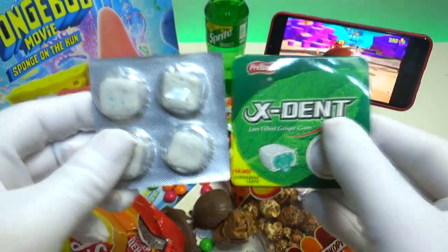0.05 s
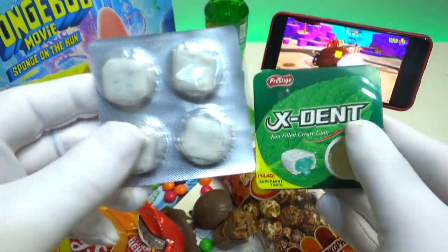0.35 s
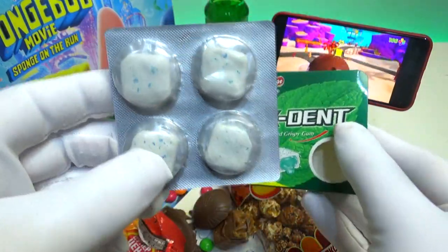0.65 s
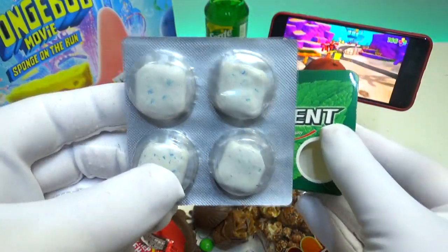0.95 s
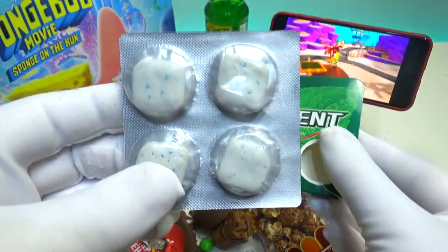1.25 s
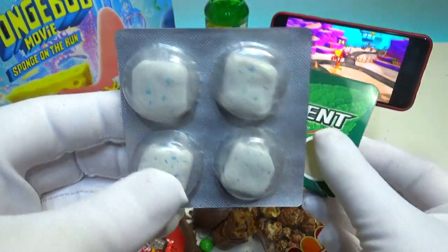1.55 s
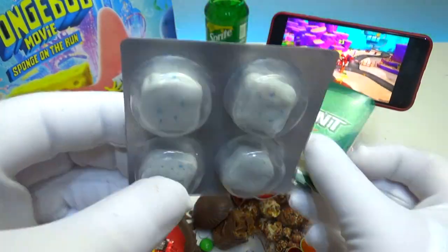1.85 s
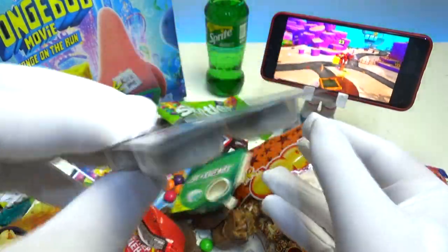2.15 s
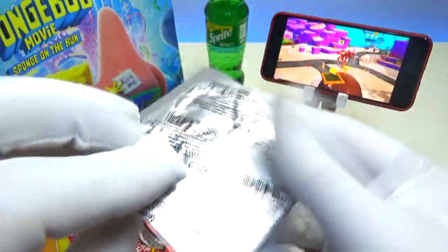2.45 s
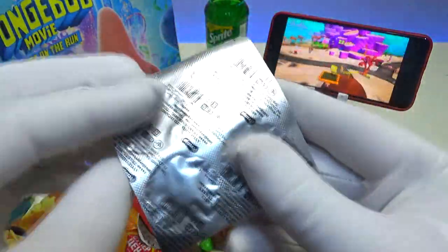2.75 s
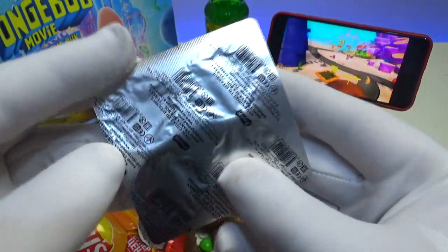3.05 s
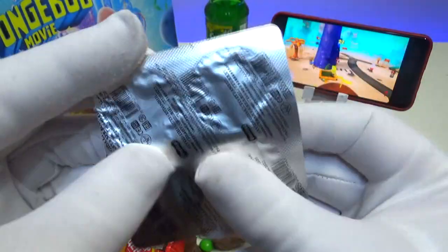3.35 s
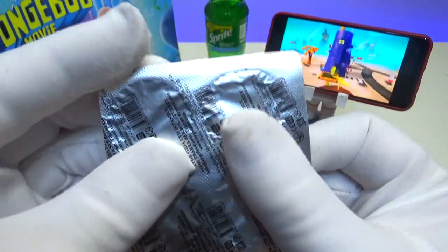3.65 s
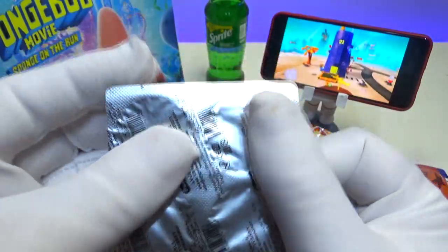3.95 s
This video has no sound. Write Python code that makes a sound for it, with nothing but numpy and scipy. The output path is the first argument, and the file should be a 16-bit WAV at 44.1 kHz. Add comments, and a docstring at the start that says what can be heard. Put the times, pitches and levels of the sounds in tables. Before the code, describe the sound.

A foil and plastic blister pack slides from its card sleeve, then crackles under pressing fingers.

```python
"""Gloved hands handle a blister pack close up in a small, quiet room. First the pack rasps out of its card
sleeve, whose air rings and sinks in pitch. From 0.7 s gloves brush the plastic as it is turned over;
a fingertip swishes along the rim, then a thumb drags across the blisters. From 2 s the foil is pressed:
its facets buckle in sharp snaps, sparse until then, over fine crackle and dull finger rubbing.
A fast limiter holds down the peaks."""
import sys
import numpy as np
from scipy import signal
from scipy.fft import rfft, irfft
from scipy.io import wavfile
from scipy.ndimage import uniform_filter1d, minimum_filter1d

SR = 44100
rng = np.random.default_rng(int(sys.argv[2]) if len(sys.argv) > 2 else 0)


def put_to_file(sound):
    """Save the sound as 16-bit audio at rate SR, in the file named by the first command-line argument."""
    columns = np.atleast_2d(sound).T  # one column per channel
    safe = np.clip(columns, -1, 1)
    whole_steps = np.round(safe * 32767)
    wavfile.write(sys.argv[1], SR, whole_steps.astype(np.int16))


N = 176400

# Buckles of the pack. Each row: start in seconds, relative level in dB, nominal decay in ms,
# low edge in Hz, tilt in dB per octave, first ring in Hz, second ring in Hz.
SNAPS = [(0.031, -28.5, 4.4, 400, -2.5, 2160, 4350), (0.0427, -23.5, 4.3, 1790, -3.5, 2830, 9700),
         (0.0664, -27.5, 7.2, 120, -4, 1450, 4140), (0.1122, -33.5, 4.3, 624, -6.5, 876, 2660),
         (0.355, -23, 5.5, 2130, -5, 2850, 5400), (0.827, -33, 6.1, 790, -5, 2200, 7240),
         (0.9387, -36, 3.5, 714, -6, 2530, 6600), (1.4972, -25.5, 2.8, 2320, 3.5, 7850, 10230),
         (1.6081, -21, 3, 2800, -5.5, 5780, 10160), (1.6542, -29.5, 3.3, 2740, -8.5, 2300, 5000),
         (1.7365, -21.5, 7.2, 2710, 0, 2470, 4470), (1.932, -25.5, 3.5, 1880, -2.5, 2440, 6100),
         (1.9551, -18.5, 1.3, 2340, 3, 5840, 6450), (2.0372, -15, 4.5, 463, 2, 2760, 9160),
         (2.052, -25.5, 3.3, 2120, -8, 4180, 4840), (2.0663, -18.5, 9.2, 800, -6, 1270, 1580),
         (2.0715, -15.5, 2.6, 796, 0, 1630, 6800), (2.0797, -15.5, 4.2, 1290, -4.5, 4000, 5080),
         (2.1027, -18, 3.9, 2710, 4, 2530, 9100), (2.1121, -15.5, 3.6, 2230, -2.5, 2535, 4830),
         (2.1284, -18, 5.7, 1750, -11.5, 2520, 5170), (2.1634, -24, 5.9, 630, -5.5, 580, 6300),
         (2.198, -26.5, 4.5, 360, 0.5, 2560, 6580), (2.211, -24, 3.7, 600, -12.5, 654, 4720),
         (2.273, -23.5, 2.6, 1470, -8.5, 3140, 4830), (2.3235, -27, 2.6, 3440, -7, 4040, 5400),
         (2.3372, -20, 5.3, 2550, -5, 3070, 6350), (2.3526, -16, 5.9, 2050, -3, 3240, 4480),
         (2.3663, -20.5, 7.3, 2550, -5.5, 3270, 4570), (2.464, -19, 4.1, 3400, -9, 3930, 4990),
         (2.4819, -21.5, 1.9, 2260, -4, 3770, 7600), (2.5095, -15, 5, 3460, 3, 3040, 8500),
         (2.527, -16.5, 2.6, 3850, -4.5, 4380, 9500), (2.5552, -22, 0.47, 1640, -7.5, 1720, 8100),
         (2.5761, -19, 3.8, 1770, -2.5, 2150, 6960), (2.5994, -20.5, 1.7, 2020, -3.5, 3680, 4530),
         (2.6048, -18, 1.3, 2540, 0, 3170, 7400), (2.6395, -17, 3.3, 2410, -6, 3160, 8930),
         (2.6465, -15, 7.9, 2330, -3, 3510, 4880), (2.6869, -17, 1.8, 2160, -0.5, 2470, 8860),
         (2.721, -15.5, 3.6, 2570, -3.5, 2740, 5630), (2.7271, -15, 4.4, 1790, -1, 4030, 6450),
         (2.7323, -16, 3.3, 2420, -5.5, 4140, 4970), (2.7415, -20, 1.6, 2710, 5, 2950, 9900),
         (2.7702, -14, 4.3, 1680, -0.5, 2660, 9000), (2.79, -20, 5, 2550, 8, 2370, 9400),
         (2.8013, -21, 1.2, 1770, 6.5, 4100, 4900), (2.8053, -15.5, 4.7, 1760, 0.5, 3940, 5940),
         (2.819, -16, 4.9, 1880, 0.5, 4100, 5580), (2.839, -20, 3.4, 2120, -3, 3860, 5070),
         (2.864, -15.5, 5.3, 2100, -4, 4190, 6680), (2.894, -17.5, 5.2, 2550, -2, 3000, 5050),
         (2.908, -14.5, 2.2, 2300, 4.5, 2643, 4440), (2.9441, -14.5, 3.8, 2300, -0.5, 3840, 5030),
         (2.9513, -13.5, 5.7, 2880, -6, 3660, 4600), (2.9842, -23, 7.1, 1880, -6.5, 2600, 3970),
         (3.031, -22.5, 4, 2550, -1, 3160, 9060), (3.0462, -17.5, 3.5, 2920, -2.5, 3290, 6240),
         (3.057, -14, 3.1, 2030, 1, 3880, 6060), (3.1299, -16, 4.3, 2650, 0, 4530, 7200),
         (3.1984, -11.5, 4.4, 3200, -3.5, 3140, 4630), (3.2525, -37.5, 13, 110, -9, 148, 336),
         (3.2552, -14.5, 5, 2540, -5, 2734, 4050), (3.27, -16, 3.3, 1450, 1, 2810, 7100),
         (3.2829, -16, 2.5, 2710, 2, 3080, 9200), (3.2989, -19.5, 6, 2400, -4, 2840, 9700),
         (3.344, -18, 0.89, 2950, -2, 4060, 6200), (3.3481, -14.5, 5, 2000, -1.5, 3900, 4480),
         (3.394, -17.5, 3.3, 2800, -2, 3890, 8800), (3.4104, -15.5, 5.8, 2280, -3, 3090, 4670),
         (3.4161, -17, 2.4, 1650, -2.5, 2870, 5730), (3.4608, -18, 0.54, 2550, -5.5, 3670, 6100),
         (3.4694, -22.5, 2.9, 2260, -3, 4380, 4460), (3.475, -21, 1.1, 2140, 2, 4140, 6200),
         (3.499, -15, 8.4, 2040, -2, 3880, 4510), (3.5351, -15.5, 5.8, 1800, -0.5, 4030, 8000),
         (3.5545, -14, 7.5, 2300, -3, 4300, 6300), (3.571, -20, 1.2, 2440, -5.5, 3860, 5880),
         (3.5758, -17, 6.3, 2140, -0.5, 3250, 7260), (3.6089, -20, 1.4, 1410, 1.5, 2840, 7450),
         (3.6307, -15, 0.8, 2610, 0, 2800, 6840), (3.6523, -20, 1.3, 1730, -3.5, 2700, 5860),
         (3.656, -20.5, 1.2, 4500, 0, 8400, 9800), (3.6694, -18, 2.8, 1460, 6, 3840, 8050),
         (3.6946, -18.5, 1.4, 1880, 0.5, 3900, 6900), (3.721, -13.5, 4.6, 2640, -3.5, 3140, 5020),
         (3.762, -17, 1.9, 2970, -3.5, 3370, 5240), (3.7663, -18, 4, 2280, 0, 2730, 7100),
         (3.7897, -20, 1.8, 1280, 0.5, 3100, 8100), (3.7997, -18.5, 1.3, 710, 3, 4030, 6140),
         (3.8028, -19, 1.4, 2420, 0, 2860, 8300), (3.8185, -23.5, 4.1, 2120, -2, 2850, 6200),
         (3.8306, -18, 2.3, 2710, 0, 3460, 7000), (3.836, -18, 2.7, 3260, 2, 4420, 6700),
         (3.8489, -19, 0.42, 2400, 1.5, 3560, 7000), (3.8658, -17, 2.3, 1050, -2, 4100, 6280),
         (3.901, -15.5, 3.1, 1390, 1, 3420, 4880), (3.9426, -21.5, 1.4, 2260, -5, 2880, 5240),
         (3.963, -17, 1.6, 1260, -1, 1560, 8250), (3.9905, -21.5, 5.3, 1870, 0, 2740, 4800)]
# Facets ringing on. Each row: start in seconds, pitch in Hz, relative level in dB, decay in ms.
PINGS = [(1.6085, 3300, -20.5, 4.3), (2.1121, 2508, -12, 6), (2.6463, 2405, -25, 9),
         (2.7713, 1679, -35, 15), (2.864, 1644, -31, 15), (2.908, 2620, -25, 12), (2.9441, 2670, -29, 14),
         (3.1314, 2734, -21.5, 13), (3.348, 2710, -14, 4.6), (3.431, 1157, -26.5, 5.2),
         (3.506, 2880, -17.5, 5.9), (3.5541, 1090, -27.5, 6.2), (3.8986, 3400, -31, 16)]
# Air modes of the sleeve. Each row: initial centre in Hz, width in Hz, gain in dB.
CAVITY_MODES = [(1670, 100, 10.5), (2770, 150, 14.5), (4760, 360, 8)]

# Envelopes. Each row: time in seconds, relative level in dB.
CRACKLE_ENV = [(2.04, -44), (2.062, -47), (2.08, -30), (2.135, -30.5), (2.19, -38.5), (2.245, -44.5),
               (2.3, -40.5), (2.355, -33), (2.405, -46), (2.435, -45), (2.46, -36.5), (2.54, -33),
               (2.62, -31), (2.72, -29.5), (2.88, -27), (2.98, -33), (3.02, -30.5), (3.12, -36),
               (3.165, -34.5), (3.195, -25.5), (3.23, -32.5), (3.3, -27), (3.38, -31), (3.52, -30.5),
               (3.6, -33.5), (3.74, -35.5), (3.84, -34), (3.88, -35), (4, -30)]  # foil creasing
SLEEVE_ENV = [(0, -32.5), (.028, -34.5), (.049, -25.5), (.058, -52), (.11, -45), (.13, -55.5), (.18, -43.5),
              (.21, -52), (.25, -40.5), (.3, -34), (.355, -27), (.4, -31), (.435, -23.5), (.49, -39),
              (.583, -47), (.591, -20.5), (.598, -27), (.604, -19), (.615, -20), (.621, -33.5), (.7, -49),
              (.79, -54)]  # pack on card
CAVITY_ENV = [(.42, -46), (.48, -41), (.54, -40.5), (.585, -40.5), (.6, -56)]  # scrape driving the sleeve's air
BRUSH_ENV = [(.68, -74), (.73, -51), (.8, -57.5), (.86, -42.5), (.91, -51), (.98, -41), (1.08, -55.5),
             (1.15, -45), (1.222, -54.5), (1.238, -42.5), (1.26, -65), (1.267, -39), (1.285, -48),
             (1.31, -45.5), (1.405, -50), (1.414, -40.5), (1.43, -51), (1.48, -45), (1.54, -46.5),
             (1.585, -48.5), (1.63, -53), (1.748, -41), (1.8, -46.5), (1.86, -52.5), (1.95, -42.5),
             (2.035, -45.5)]  # gloves on plastic
THUMB_ENV = [(1.62, -52), (1.66, -37.5), (1.72, -35.5), (1.75, -27.5), (1.78, -38), (1.81, -50)]  # thumb on blisters
RIM_ENV = [(1.02, -59), (1.1, -50.5), (1.2, -68)]  # fingertip on rim
GRIP_ENV = [(0, -47), (.06, -49.5), (.14, -58), (.26, -54.5), (.44, -65), (.5, -95), (.585, -45.5),
            (.61, -23.5), (.635, -48.5), (.8, -58.5), (2.045, -64), (2.075, -31), (2.2, -36.5), (2.25, -41),
            (2.29, -39), (2.41, -54.5), (2.46, -40), (2.49, -52), (2.545, -30), (2.59, -61.5),
            (2.72, -48.5), (2.85, -68), (3.16, -58), (3.22, -45.5), (3.258, -41), (3.285, -60),
            (3.75, -64.5), (4, -54)]  # fingers heard through the pack

# Spectra of the same sources, the snaps and the room. Each row: frequency in Hz, gain in dB.
CRACKLE_EQ = [(180, -65), (300, -43), (800, -17.5), (1150, -11.5), (2210, -8), (2790, 3), (3700, -1),
              (4670, 1.5), (5520, -2.5), (6100, -1.5), (9880, -3.5), (15000, -26), (16000, -27)]
SLEEVE_EQ = [(80, -29), (170, -26.5), (270, -11.5), (400, -28.5), (620, -10), (900, -19.5), (1150, -8),
             (1380, -19.5), (1680, -5), (1800, -16), (2090, -4.5), (2195, -2), (2290, -4.5), (2410, -1.5),
             (2700, -7.5), (2930, -6), (3200, -9.5), (4300, -7), (10000, -10.5), (12000, -22), (16000, -36)]
CAVITY_EQ = [(950, -20), (1400, -1.5), (4600, -2.5), (10000, -6), (14000, -18)]
BRUSH_EQ = [(300, -8), (600, -15.5), (1900, -7), (2700, -2.5), (3800, -4.5), (5200, -2), (9000, -2.5),
            (10500, -4.5), (12000, -15), (16000, -25)]
THUMB_EQ = [(200, -30), (430, -1), (600, -7), (800, -5.5), (1200, -11), (2000, -8.5), (2450, 1.5),
            (3800, -9), (4700, 1), (7200, 0.5), (8500, -7.5), (11000, -19), (16000, -35)]
RIM_EQ = [(2000, -19), (2850, 3), (4000, -45)]
GRIP_EQ = [(25, -36), (60, -14), (120, -8.5), (260, -2), (370, -2), (480, 0), (650, 3), (900, -1.5),
           (1200, 1.5), (1700, -2.5), (4000, -25.5)]
SNAP_EQ = [(100, -17), (400, -1), (3000, 1), (9800, 1.5), (11500, -8), (14000, -15.5), (16000, -24.5)]
ROOM_TONE_EQ = [(20, -32), (48, 8), (70, -1), (90, 4.5), (130, 0.5), (450, -11), (1000, -23), (2500, 2.5),
                (8000, -18), (16000, -19)]


def snap(level_db, decay_ms, edge_hz, tilt_db_per_oct, ring1_hz, ring2_hz):
    """A facet flips: a tick and noise burst, weak below the edge frequency, plus two rings."""
    t_s, hz = np.arange(2048) / SR, np.fft.rfftfreq(2048, 1 / SR)
    t_ms, life_ms = t_s * 1e3, max(decay_ms, .5)
    rise = 1 - np.exp(-t_ms / (.11 * life_ms))
    burst = rng.standard_normal(len(t_s)) * rise * np.exp(-t_ms / (.83 * life_ms))
    tick = amp(3.5 - 1.6 * decay_ms)  # strongest in short snaps
    slope = (hz / edge_hz) ** 3.86
    highpass = slope / np.hypot(1, slope) + amp(-35)
    tilt = amp(tilt_db_per_oct * np.log2(np.maximum(hz, 400)))
    gain = highpass * tilt * eq_gain(SNAP_EQ, hz)
    log_gain = np.log(np.r_[gain, gain[-2:0:-1]])
    min_phase = np.exp(np.conj(signal.hilbert(log_gain)))[:len(hz)]
    sound = unit(irfft((rfft(unit(burst)) + tick) * min_phase))
    for ring_hz, ring_db, base_ms in (ring1_hz, -5, 3.7), (ring2_hz, -4, 1.25):
        wave = np.sin(2 * np.pi * (ring_hz * t_s + rng.random()))
        ring_ms = np.sqrt(base_ms * life_ms)
        sound += amp(ring_db) * unit(wave * rise * np.exp(-t_ms / ring_ms))
    return amp(level_db - .32) * np.sqrt(.004 * SR) * unit(sound)  # level as rms over 4 ms


def buckles(pan_spread_db=1.5):
    """All snaps, each from a slightly different spot between the hands."""
    out = np.zeros((2, N))
    for start_s, *row in SNAPS:
        sound = snap(*row)
        pan_db = pan_spread_db * rng.standard_normal()
        add(out, start_s, sound * amp([[-pan_db / 2], [pan_db / 2]]))
    return out


def pings(rise_ms=.5):
    """Taut facets ring on after flipping."""
    out, t_ms = np.zeros((2, N)), np.arange(4096) / SR * 1e3
    for start_s, hz, level_db, decay_ms in PINGS:
        envelope = (1 - np.exp(-t_ms / rise_ms)) * np.exp(-t_ms / decay_ms)
        ring = np.sin(2 * np.pi * hz * t_ms / 1e3) * envelope
        add(out, start_s, amp(level_db) * ring[None])
    return out


def foil_crackle():
    """Tiny creases give way as the foil bends."""
    return friction(CRACKLE_ENV, CRACKLE_EQ, slips_per_s=1500, spread_db=4, ring_ms=1.05, hiss=.44)


def sleeve_rasp():
    """The pack scrapes along the card."""
    return friction(SLEEVE_ENV, SLEEVE_EQ, slips_per_s=3500, spread_db=2.5, ring_ms=.61, hiss=.61)


def sleeve_cavity(sag_oct_per_s=1.2):
    """The scrape rings the sleeve's air; pitch sinks as the cavity lengthens."""
    scrape = friction(CAVITY_ENV, CAVITY_EQ, slips_per_s=4400, spread_db=4, ring_ms=.33, hiss=1)
    elapsed_s = np.clip(np.arange(N) / SR - CAVITY_ENV[0][0], 0, 1)
    sag = 2 ** (-sag_oct_per_s * elapsed_s)
    return scrape + sum(amp(db) * resonate(scrape, hz * sag, width_hz) for hz, width_hz, db in CAVITY_MODES)


def glove_rub():
    """Gloves brush the plastic, drag over the blisters and swish along the rim."""
    brush = friction(BRUSH_ENV, BRUSH_EQ, slips_per_s=1400, spread_db=4.5, ring_ms=1, hiss=.83)
    thumb = friction(THUMB_ENV, THUMB_EQ, slips_per_s=1100, spread_db=1, ring_ms=.51, hiss=.49)
    rim = friction(RIM_ENV, RIM_EQ, slips_per_s=2900, spread_db=0, ring_ms=1, hiss=1)
    return brush + thumb + rim


def finger_grip():
    """Finger rubbing, dulled by the body of the pack."""
    return friction(GRIP_ENV, GRIP_EQ, slips_per_s=600, spread_db=9, ring_ms=3.1, hiss=.76)


def friction(envelope, eq, slips_per_s, spread_db, ring_ms, hiss):
    """Random micro-slips ring small facets over smooth hiss; the contact wanders between facets."""
    facets, facets_per_s, facets_at_once = 24, 45, 5.5
    t_s, ring_t_ms = np.arange(N) / SR, np.arange(512) / SR * 1e3
    strength = amp(spread_db * np.minimum(rng.exponential(1, N), 4))
    slips = strength * (rng.random(N) < slips_per_s / SR)
    touched = (t_s * facets_per_s + facets_at_once * rng.random(N)).astype(int) % facets
    rings = rng.standard_normal((facets, len(ring_t_ms))) * np.exp(-ring_t_ms / ring_ms)
    grains = sum(signal.oaconvolve(slips * (touched == k), unit(rings[k]))[:N] for k in range(facets))
    level_db = np.interp(t_s, *np.transpose(envelope), left=-120, right=-120)
    return amp(level_db) * equalize(unit(grains) + hiss * unit(rng.standard_normal(N)), eq)


def reflections(x, t60_s, delay_s, band_hz):
    """Decaying random reflections, different per channel."""
    t_s = np.arange(SR // 3) / SR
    tails = rng.standard_normal((2, len(t_s))) * amp(-60 * t_s / t60_s) * (t_s > delay_s)
    tails = signal.lfilter(*signal.butter(1, band_hz, "bandpass", fs=SR), tails)
    return np.array([signal.oaconvolve(side, unit(tail))[:N] for side, tail in zip(x, tails)])


def room_tone():
    """Faint steady rumble and hiss."""
    return amp(-61) * equalize(rng.standard_normal(N), ROOM_TONE_EQ)


def resonate(x, hz, width_hz):
    """Unity-gain resonator following a frequency curve."""
    phasor = np.exp(2j * np.pi * np.cumsum(hz) / SR)
    pole = np.exp(-np.pi * width_hz / SR)
    return 2 * (phasor * signal.lfilter([1 - pole], [1, -pole], x / phasor + 1e-18)).real


def equalize(x, eq):
    """Applies a spectrum; output rms is one."""
    gain = eq_gain(eq, np.fft.rfftfreq(N, 1 / SR))
    return unit(irfft(rfft(x) * gain, N)) * np.sqrt(N)


def eq_gain(eq, hz):
    """Gain of a spectrum, interpolated over log frequency."""
    points_hz, points_db = np.transpose(eq)
    return amp(np.interp(np.log(hz + 1), np.log(points_hz), points_db))


def amp(db):
    """Decibels to gain."""
    return 10 ** (np.asarray(db) / 20)


def unit(x):
    """Scales to unit energy."""
    return x / np.sqrt(np.sum(x ** 2) + 1e-20)


def add(mix, start_s, sound):
    """Adds a sound to the stereo mix."""
    part = mix[:, round(start_s * SR):][:, :sound.shape[1]]
    part += sound[:, :part.shape[1]]


def scene():
    """Pack and hands near the centre, with tabletop and room reflections."""
    sleeve = (sleeve_rasp() + sleeve_cavity()) * amp([[-.6], [.6]])
    pack = sleeve + glove_rub() + finger_grip() + foil_crackle() + buckles() + pings()
    tabletop = amp(-16) * reflections(pack, t60_s=.0035, delay_s=.0004, band_hz=(476, 13900))
    room = amp(-17) * reflections(pack, t60_s=.17, delay_s=.00087, band_hz=(278, 3550))
    return (pack + tabletop + room + room_tone()) * amp([[-.15], [.15]])


def record(dry):
    """Fast look-ahead limiter, then low-pass."""
    ceiling, release_db_per_s, lookahead_s, cutoff_hz = .68, 1800, .0007, 16200
    over_db = np.maximum(20 * np.log10(abs(dry).max(0) / ceiling + 1e-9), 0)
    release_db = np.arange(N) * release_db_per_s / SR
    gain_db = release_db - np.maximum.accumulate(over_db + release_db)
    width = 2 * int(lookahead_s * SR / 2) + 1
    limited = dry * amp(uniform_filter1d(minimum_filter1d(gain_db, width), width))
    lowpass = signal.firwin(255, cutoff_hz, window=("kaiser", 8), fs=SR)
    return signal.oaconvolve(limited, lowpass[None], "same")


dry = scene()
out = record(dry)
put_to_file(out)
```